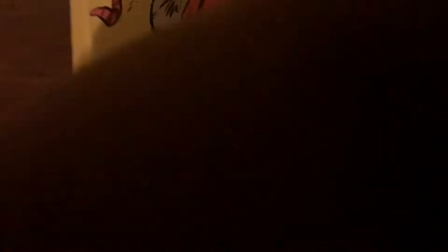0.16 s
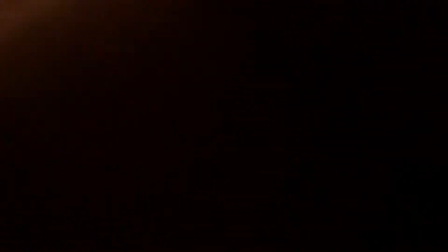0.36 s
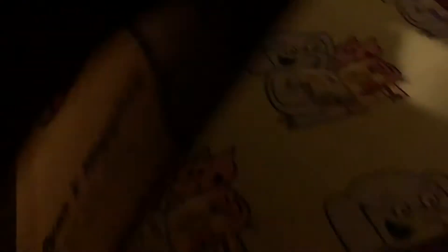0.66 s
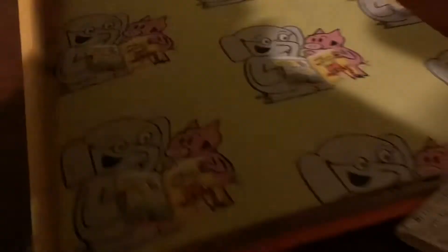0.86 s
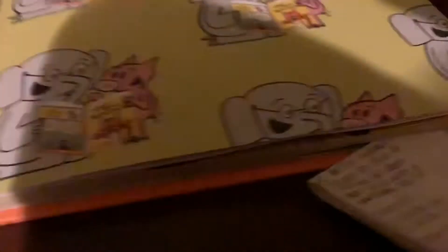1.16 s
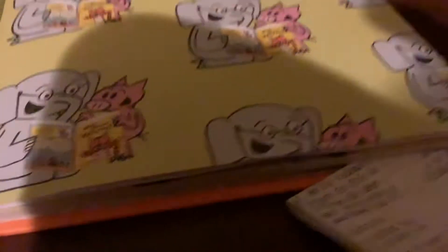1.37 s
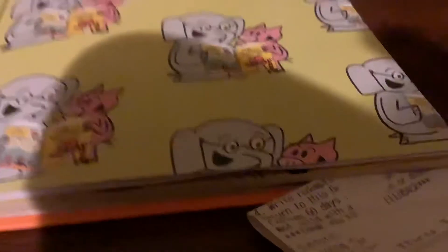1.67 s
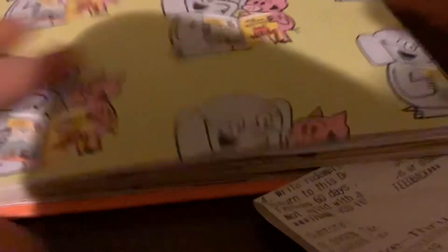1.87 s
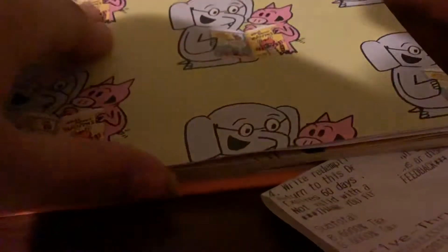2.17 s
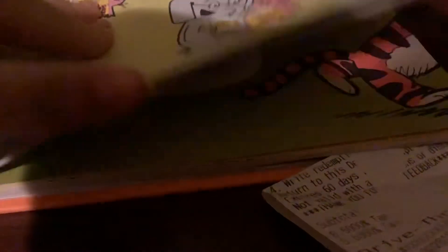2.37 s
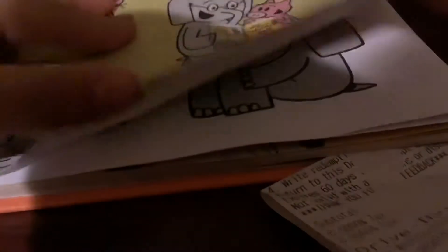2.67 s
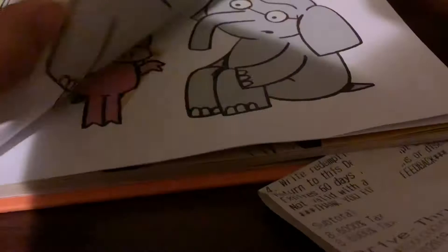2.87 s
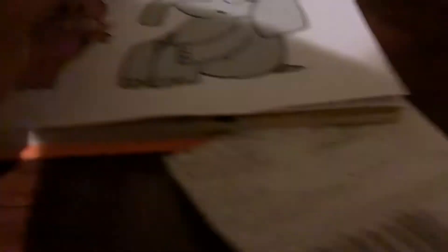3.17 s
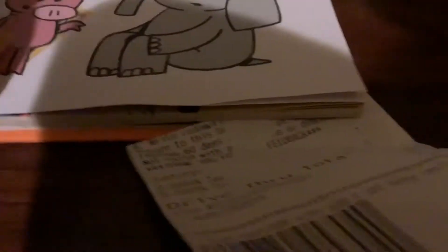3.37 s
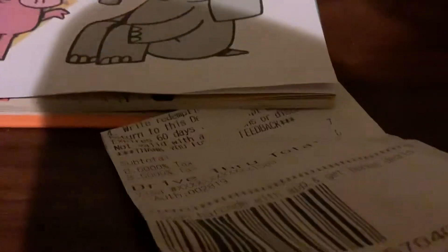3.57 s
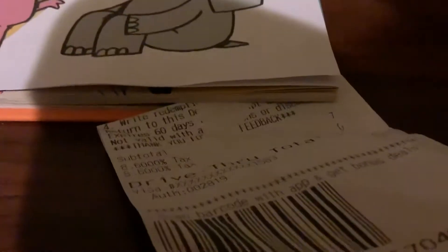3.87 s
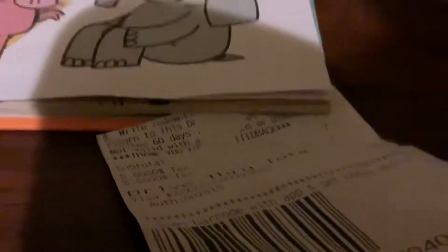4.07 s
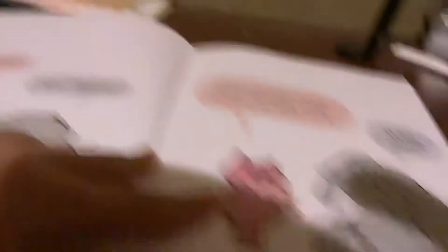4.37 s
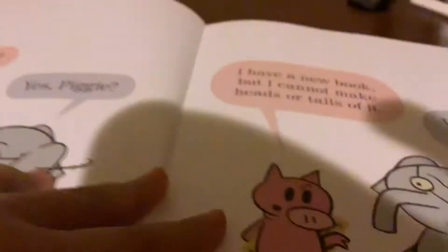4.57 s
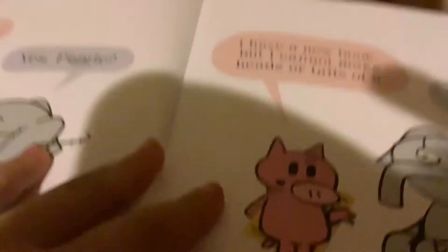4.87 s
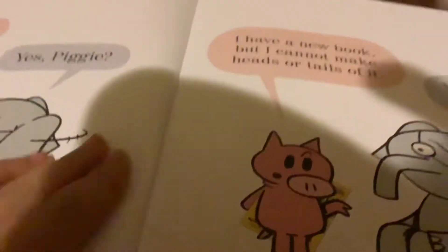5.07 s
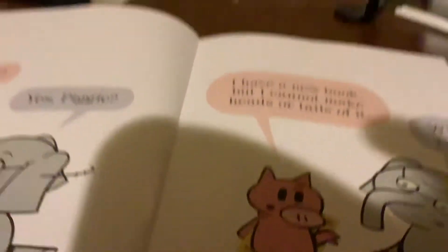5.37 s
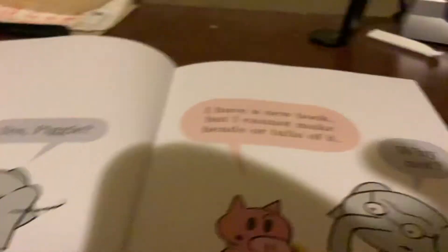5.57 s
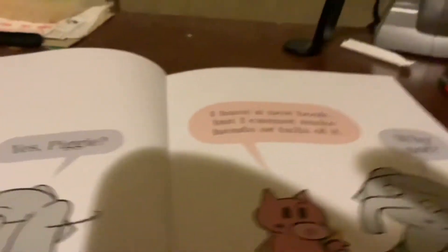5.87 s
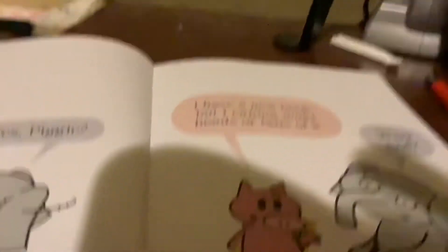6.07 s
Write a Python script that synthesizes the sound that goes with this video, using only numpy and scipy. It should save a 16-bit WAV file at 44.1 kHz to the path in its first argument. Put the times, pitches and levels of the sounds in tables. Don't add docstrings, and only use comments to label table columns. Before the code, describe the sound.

Very close to a small microphone in a quiet room, fingertips hiss on paper while a stiff book cover creaks open and knocks a wooden table. A quieter pause holds a few tiny ticks, then pages turn in a dense crackle of flaps and sharp snaps, ending in a low thump. Smooth rubbing strokes follow, and a last heavy bump.

```python
import sys
import numpy as np
from scipy import signal
from scipy.fft import rfft, irfft, next_fast_len
from scipy.io import wavfile
from scipy.ndimage import uniform_filter1d

SR = 44100
rng = np.random.default_rng(int(sys.argv[2]) if len(sys.argv) > 2 else 0)


def volts_from_decibels(level):
    exponent = np.asarray(level, float) / 20
    return 10 ** exponent


def to_wav(sig):
    pcm = np.clip(np.atleast_2d(sig), -1, 1) * 32767
    pcm = np.round(pcm).astype(np.int16)
    wavfile.write(sys.argv[1], SR, pcm.T)


N = 274783


def rms_one(x):
    return x / np.sqrt(np.mean(x ** 2) + 1e-20)


def peak_one(x):
    return x / (np.abs(x).max() + 1e-20)


def decay(t, t60_s):
    return volts_from_decibels(-60 * t / t60_s)


def onset(t, rise_s):
    return 1 - np.exp(-t / rise_s)


def add(out, s, sound):
    i = max(round(s * SR), 0)
    out[i:i + len(sound)] += sound[:N - i]


def drift(rate_hz):
    step = 20
    r = np.exp(-2 * np.pi * rate_hz * step / SR)
    settle = 4000
    noise = rng.standard_normal(N // step + settle + 2)
    slow = signal.lfilter([1], [1, -2 * r, r * r], noise)[settle:]
    return np.interp(np.arange(N) / step, np.arange(len(slow)), rms_one(slow))


def resonance(x, hz, width_hz):
    r = np.exp(-np.pi * width_hz / SR)
    poles = [1, -2 * r * np.cos(2 * np.pi * hz / SR), r * r]
    return signal.lfilter([(1 - r * r) / 2, 0, (r * r - 1) / 2], poles, x)


def double_resonance(x, hz, width_hz):
    return resonance(resonance(x, hz, width_hz), hz, width_hz)


def coloured(x, spectrum):
    hz, level_db = np.transpose(spectrum)
    size = next_fast_len(len(x))
    bins_hz = np.fft.rfftfreq(size, 1 / SR) + 1e-3
    gain = volts_from_decibels(np.interp(np.log(bins_hz), np.log(hz), level_db, -90, -90))
    return rms_one(irfft(rfft(x, size) * gain, size)[:len(x)])


def friction(spectrum, grain_db, flutter_db, flutter_hz):
    grain_size = np.minimum(rng.exponential(1, N), 4)
    grains = rng.standard_normal(N) * volts_from_decibels(grain_db * grain_size)
    return rms_one(coloured(grains, spectrum) * volts_from_decibels(flutter_db * drift(flutter_hz)))


def movements(rows, own_db, rest_db):
    fade_db, bend = 15, 1.21
    t = np.arange(0, N + 40, 40) / SR
    out = np.full(len(t), volts_from_decibels(rest_db))
    for (s, db, rise_s, fall_s, _), own in zip(rows, own_db):
        away = np.maximum((s - t) / max(rise_s, .01), (t - s) / max(fall_s, .01))
        out += volts_from_decibels(db + own - fade_db * away ** bend)
    return np.interp(np.arange(N) / SR, t, out)


# [t/s, hiss/dB, rise/s, fall/s, lightness/dB]
STROKES = [(0.0, -43.5, .03, 0.059, -19), (0.1, -44.5, 0.018, 0.31, -19.5),
           (0.4, -43.5, 0.067, 0.51, -17), (0.69, -42.5, 0.18, 0.2, -19),
           (0.93, -49, 0.097, 0.076, -18), (1.135, -50, 0.14, 0.034, -20),
           (1.392, -50.5, 0.12, 0.076, -20), (1.614, -42.5, 0.08, 0.3, -7),
           (1.7, -61, 0.17, 0.38, 1), (1.831, -41, 0.11, 0.033, -7), (1.92, -63.5, 0.041, 0.4, -13),
           (2.341, -57.5, 0.013, 0.045, -18), (2.457, -45.5, 0.033, 0.25, -22),
           (2.7, -42, 0.03, 0.084, -23), (2.83, -57, 0.067, 0.33, -32),
           (2.241, -66, 0.78, 0.044, -17),
           (2.972, -46, 0.043, 0.11, -12), (3.046, -50, 0.15, 0.087, -34),
                   (3.2, -43.5, 0.2, 0.078, -14), (3.39, -39, 0.085, 0.098, -15),
                   (3.56, -49, 0.098, .06, -10), (3.67, -46.5, 0.0082, 0.2, -18),
                   (3.751, -38.5, 0.065, 0.041, -15), (3.92, -41, 0.057, 0.034, -35),
                   (3.986, -34.5, 0.01, 0.052, -22), (4.137, -39, 0.026, 0.32, -22),
                   (4.26, -42, 0.21, 0.094, -17), (4.497, -55, 0.058, 0.071, -4),
                   (4.645, -41, 0.11, .15, -17.5), (4.948, -43, 0.062, 0.13, -3),
                   (5.29, -39, 0.15, 0.15, -3.5), (5.69, -39.5, 0.31, 0.037, -21),
                   (5.87, -44, 0.32, 0.093, -19), (6.0, -59, 0.017, .4, -22),
                   (6.149, -41, 0.085, 0.35, -26)]


def touch(base_db, per_lightness_db):
    rows = np.array(STROKES)
    still_db = -91 + base_db - 8 * per_lightness_db
    return movements(rows, base_db + per_lightness_db * rows[:, -1], still_db)


# [f/Hz, density/dB]
PAPER_SPECTRUM = [(1760, -34), (3000, -7.5), (3240, -15.5), (4020, -5), (4520, -2.5), (4910, -5.5),
                  (5450, -3.5), (5930, -10), (6400, -3), (7510, -4), (8160, -1.5), (10500, -2.5),
                  (12400, -8.5), (14800, -17.5), (15800, -17)]
# [f/Hz, level added/dB]
HISS_PARTS = [
    (4500, 5),
    (8300, -2),
    (13200, 8.5),
]


def fingers():
    patchy_db, patchy_hz = 1.6, 6.4
    size = next_fast_len(N)
    hiss = rfft(friction(PAPER_SPECTRUM, grain_db=3.0, flutter_db=1.5, flutter_hz=27.8), size)
    part_hz, offset_db = np.transpose(HISS_PARTS)
    gains = [touch(-11, -0.091), touch(0, 0), touch(-1, 0.66)]
    levels_db = 20 * np.log10(gains) + offset_db[:, None]
    centres = np.log(np.geomspace(3200, 15500, num=12))
    bins = np.log(np.fft.rfftfreq(size, 1 / SR) + 1)
    out = np.zeros(N)
    for centre, window in zip(centres, np.eye(len(centres))):
        shares = [np.interp(centre, np.log(part_hz), row) for row in np.eye(len(part_hz))]
        hiss_band = irfft(hiss * np.interp(bins, centres, window), size)[:N]
        out += volts_from_decibels(shares @ levels_db + patchy_db * drift(patchy_hz)) * hiss_band
    return out


# [start/s, stop/s, end level/dB, swell/dB]
SWIPES = [
    (3.126, 3.155, -28.5, 13),
    (3.172, 3.238, -43, -12),
    (3.036, 3.047, -30, 4),
    (3.3, 3, -38, 2),
]


def swipes():
    out, t = np.zeros(N), np.arange(N) / SR
    hiss = friction(PAPER_SPECTRUM, grain_db=0.0, flutter_db=-1.5, flutter_hz=60)
    for start, stop, end_db, swell_db in SWIPES:
        gate = np.clip((t - start) / 0.0024, 0, 1) * np.clip((stop - t) / 0.0063, 0, 1)
        left = np.clip((stop - t) / (stop - start), 0, 1)
        out += gate * volts_from_decibels(end_db - swell_db * left) * hiss
    return out


# [t/s, peak level/dB, ring f/Hz, sheet body level/dB]
SNAPS = [(0.3516, -13.5, 8700, -31), (0.5531, -17, 5200, -45), (0.7469, -26.5, 8050, -47),
         (0.9248, -32, 7000, -58), (1.506, -46, 10900, -52), (1.605, -14, 4400, -14.5),
         (1.6424, -48, 12100, -31.5), (2.1647, -30, 9700, -55), (2.426, -20, 10100, -28),
         (2.4445, -19, 9100, -23), (3.045, -13.5, 4270, -32), (3.654, -27, 8340, -43),
         (3.726, -29, 4180, -28), (3.733, -16, 4270, -38), (3.8582, -31.5, 6610, -33),
         (3.8869, -32, 3780, -20.5), (3.9, -30, 4200, -30), (3.9638, -22, 3570, -21),
         (3.9703, -.5, 6240, -14.5), (3.995, -27, 7900, -39), (4.13, -15.5, 4500, -26),
         (4.154, -25, 6880, -32), (4.4837, -18.5, 9150, -53), (4.4936, -28.5, 7950, -44),
         (5.3135, -37, 3700, -39.5), (5.6922, -27, 4800, -38), (5.9821, -21, 8440, -27.5),
         (6.0487, -25.5, 7700, -38), (6.0916, -38, 6770, -55), (6.1195, -34, 9700, -48)]
# [t/s, peak level/dB]
TICKS = [(0.025, -33), (0.228, -56), (0.58, -36), (1.116, -48), (1.767, -48), (1.231, -74), (1.2965, -65),
         (1.916, -52), (2.153, -40), (2.266, -58), (2.2977, -46.5), (2.3316, -52), (2.4147, -37),
         (2.695, -35), (2.8818, -31), (3.477, -29), (3.783, -32), (3.834, -34), (4.462, -32.5),
         (4.806, -41), (4.8456, -41), (5.057, -39.5), (6.03, -36), (3.172, -30), (3.18, -30), (3.388, -34),
         (3.399, -34), (3.543, -36), (3.843, -37), (3.922, -33), (3.931, -32), (2.49, -40)]
# [f/Hz, width/Hz, level/dB]
SHEET_MODES = [(1560, 200, 0), (2200, 250, -1), (1000, 800, -5), (2850, 500, -6)]


def snaps():
    tick_hz, tick_body_db = 8200, -12
    tail_db = -25.0
    out, t = np.zeros(N), np.arange(3000) / SR
    edges = SNAPS + [(s, db, tick_hz, db + tick_body_db) for s, db in TICKS]
    chance = rng.standard_normal((len(edges), 2, len(t)))
    high = signal.butter(2, [2600, 11000], "band", fs=SR, output="sos")
    dull = signal.butter(4, 3200, fs=SR, output="sos")
    for (s, peak_db, hz, body_db), (a, b) in zip(edges, chance):
        t60_s = 0.014 * volts_from_decibels(0.17 * np.clip(body_db - peak_db + 19, -15, 15))
        fall = decay(t, t60_s) + volts_from_decibels(tail_db) * decay(t, 0.12)
        crackle = a * fall * onset(t, 0.00027)
        bright = signal.sosfilt(high, crackle) + 2.7 * resonance(crackle, hz, 1040)
        bright = bright - .6 * resonance(bright, 3500, 600)
        add(out, s, volts_from_decibels(peak_db) * peak_one(bright))
        push_fall = volts_from_decibels(-45 * t / t60_s) + volts_from_decibels(tail_db) * decay(t, 0.25)
        push = b * push_fall * onset(t, 0.00043)
        body = np.zeros(len(t))
        for k, (mode_hz, width_hz, db) in enumerate(SHEET_MODES):
            body += volts_from_decibels(db) * peak_one(resonance(push, mode_hz, width_hz)) * (-1) ** k
        add(out, s, volts_from_decibels(body_db + 3.5) * peak_one(signal.sosfilt(dull, body)))
    return out


# [t/s, peak level/dB, centre f/Hz, t60/s]
FLAPS = [(0.719, -29, 810, 0.063), (1.603, -39, 1600, 0.089), (1.647, -43, 856, 0.091),
         (2.36, -45, 1920, 0.045), (2.445, -49, 1510, 0.09), (3.08, -33, 610, 0.48),
         (3.177, -13.5, 806, 0.045), (3.196, -20, 1350, 0.07), (3.227, -25, 513, 0.045),
         (3.343, -30, 700, 0.05), (3.38, -21.5, 600, 0.068), (3.392, -19, 610, 0.055),
         (3.471, -19, 900, 0.066), (3.533, -18, 970, 0.073), (3.542, -24.5, 1450, 0.11),
         (3.575, -31, 1390, 0.094), (3.653, -28.5, 454, 0.12), (3.733, -16.5, 1690, 0.12),
         (3.866, -23.5, 1150, 0.049), (3.888, -21.5, 2100, 0.076), (3.906, -23, 900, 0.14),
         (1.033, -63, 480, 0.045), (3.971, -8, 1740, 0.03), (3.994, -21, 980, 0.092),
         (4.131, -18.5, 2010, 0.049), (4.233, -28, 500, 0.038), (4.808, -44, 990, 0.037),
         (4.33, -36, 550, 0.29), (4.899, -44, 880, 0.027), (6.151, -28.5, 2350, 0.059),
         (3.172, -28, 1910, 0.025), (3.243, -31.5, 517, 0.064), (3.334, -26, 430, .06),
         (3.387, -28, 1940, 0.03), (3.401, -23.5, 1280, 0.044), (3.426, -39, 800, 0.074),
         (3.479, -20, 1640, 0.037), (3.498, -31.5, 620, 0.041), (3.526, -23, 900, .05),
         (3.587, -30.5, 900, 0.072), (3.676, -33, 447, 0.16), (3.835, -42, 750, .06),
         (3.858, -30, 1300, 0.044), (3.921, -21, 1900, .08), (3.93, -23, 1000, 0.089),
         (3.979, -20, 593, 0.057), (4.013, -31, 1000, .06), (4.025, -39, 1600, 0.057)]


def flaps():
    lumpy_db, rise_cycles = 2, 2.4
    out, t = np.zeros(N), np.arange(8000) / SR
    chance = rng.standard_normal((len(FLAPS), 2, len(t)))
    upper = signal.butter(3, [750, 2500], "band", fs=SR, output="sos")
    lower = signal.butter(2, [250, 750], "band", fs=SR, output="sos")
    dull = signal.cheby2(4, 15, 3000, fs=SR, output="sos")
    for (s, peak_db, hz, t60_s), (a, b) in zip(FLAPS, chance):
        fall = decay(t, max(t60_s, .02))
        lumps = volts_from_decibels(lumpy_db * rms_one(uniform_filter1d(b, size=120)))
        puff = a * np.abs(a) ** .5 * lumps * fall * onset(t, rise_cycles / hz)
        top = min(hz / 1600, .7) * signal.sosfilt(upper, puff * fall ** .4)
        broad = top - .55 * signal.sosfilt(lower, puff)
        centre = 1.5 * double_resonance(puff, hz, .5 * hz)
        add(out, s, volts_from_decibels(peak_db) * peak_one(signal.sosfilt(dull, broad + centre)))
    return out


# [t/s, peak level/dB, ring f/Hz, t60/s]
BUMPS = [(0.507, -20.5, 145.5, 0.079), (0.559, -26, 119, 0.056), (0.975, -33, 113.4, 0.21),
         (3.864, -30.5, 110, 0.095), (1.028, -31, 57, 0.09), (1.604, -21.5, 308, 0.061),
         (1.618, -27.5, 82.3, 0.11), (1.612, -24, 200, .1), (1.652, -30, 190, .12), (1.59, -38, 150, .06),
         (5.384, -40, 120, .06), (2.445, -29.5, 106.5, 0.092), (2.883, -34, 169, 0.065),
         (3.179, -20.5, 117, 0.052), (3.209, -29, 111, 0.13), (3.384, -29.5, 297, 0.16),
         (3.655, -30.5, 123, 0.087), (0.121, -37.5, 215, 0.071), (4.232, -15, 300, 0.057),
         (4.137, -21.5, 330, 0.06), (4.196, -24, 103, 0.2), (4.238, -10, 99, 0.13), (4.348, -29, 89, 0.14),
         (4.462, -24.5, 172.4, 0.067), (4.487, -26, 61, 0.078), (5.059, -28, 207, 0.063),
         (5.7, -23.5, 157, 0.075), (5.706, -20, 320, 0.12), (3.046, -35.5, 151, 0.063),
         (5.966, -37, 225, 0.087), (6.117, -19.5, 298, 0.065), (6.125, -10, 112, 0.06),
         (6.149, -13.5, 215, 0.095), (6.224, -15.5, 140, 0.17), (0.0, -33, 150, .08),
         (0.53, -30, 131, 0.09), (4.215, -22, 294, 0.074), (4.29, -32, 97, .1), (4.471, -26, 95, 0.055),
         (6.095, -25.5, 200, 0.18), (6.195, -26, 110, 0.18), (5.693, -26.5, 427, 0.066),
         (3.663, -31.5, 149, 0.033)]
# [f/Hz, level/dB, t60/s]
TABLE_MODES = [(103, -3.5, 0.14), (215, -14.5, 0.13), (63, -14, 0.35)]


def bumps():
    drop_s = .004
    out, t = np.zeros(N), np.arange(16000) / SR
    chance = rng.standard_normal((len(BUMPS), len(TABLE_MODES)))
    shake_band = signal.butter(3, [145, 450], "band", fs=SR, output="sos")
    shakes = rms_one(signal.sosfilt(shake_band, rng.standard_normal((len(BUMPS), len(t)))))
    for (s, peak_db, hz, t60_s), uneven, shake in zip(BUMPS, chance, shakes):
        ring_t60_s = max(t60_s, .03)
        cycles = hz * (t + drop_s * onset(t, 0.0024))
        ring = np.sin(2 * np.pi * cycles) * decay(t, ring_t60_s)
        for (mode_hz, db, mode_t60_s), u in zip(TABLE_MODES, uneven):
            mode_fall = decay(t, mode_t60_s * ring_t60_s / 0.16)
            ring += volts_from_decibels(db + 1.5 * u) * np.sin(2 * np.pi * mode_hz * t) * mode_fall
        ring += .18 * shake * volts_from_decibels(-45 * t / t60_s)
        add(out, s, volts_from_decibels(peak_db) * peak_one(ring * onset(t, 0.0032)))
    return out


# [t/s, peak level/dB, first f/Hz, last f/Hz]
TAPS = [(1.030, -40, 800, 200), (1.506, -44, 1900, 330), (1.763, -48, 1100, 400), (2.427, -32, 1500, 260),
        (2.446, -28, 1500, 300), (2.882, -38, 900, 220), (3.178, -20, 1500, 330), (3.343, -31, 1300, 480),
        (3.972, -18, 2100, 420), (4.134, -31, 900, 280), (4.233, -18, 750, 300), (4.807, -48, 1700, 330),
        (4.834, -48, 1300, 350), (4.899, -47, 1500, 280), (5.056, -34, 700, 240), (5.313, -48, 1200, 200),
        (5.966, -36, 600, 210), (6.117, -24, 750, 300), (1.606, -22, 1400, 200), (0.551, -33, 600, 200)]


def taps():
    drop_s, t60_s, rise_s = .003, .035, .001
    out, t = np.zeros(N), np.arange(4000) / SR
    for s, peak_db, first_hz, last_hz in TAPS:
        cycles = last_hz * t + (first_hz - last_hz) * drop_s * onset(t, drop_s)
        chirp = np.sin(2 * np.pi * cycles) * decay(t, t60_s) * onset(t, rise_s)
        add(out, s, volts_from_decibels(peak_db) * peak_one(chirp))
    return out


# [t/s, peak level/dB, ring f/Hz]
SLIPS = [(0.17, -38, 820), (0.203, -36, 755), (0.235, -36, 830), (0.282, -42, 850), (0.323, -42, 840),
         (0.348, -50, 961), (0.409, -42, 778), (0.46, -33, 764), (0.509, -33, 830), (0.547, -30, 845),
         (0.582, -32, 830), (0.623, -30, 832), (0.645, -32, 899), (0.72, -31, 690), (0.868, -45, 600),
         (0.973, -44, 700)]


def slips():
    out, t = np.zeros(N), np.arange(2000) / SR
    for s, peak_db, hz in SLIPS:
        jolt = rng.standard_normal(len(t)) * decay(t, .07) * onset(t, .002)
        add(out, s, volts_from_decibels(peak_db - 1.5) * peak_one(double_resonance(jolt, hz, 400)))
    return out


# [t/s, cover level/dB, rise/s, fall/s, table over cover/dB]
DRAGS = [(0.0, -38, 0.026, 0.039, -3), (0.512, -45.5, 0.32, 0.23, -6.5), (0.93, -52.5, 1, 0.29, -3),
         (1.39, -53.5, 0.055, 0.082, -5), (1.631, -45.5, 0.045, 0.077, 10.5), (1.78, -63.5, .2, 0.3, 0.5),
         (2.2, -66, 0.18, 0.079, 0), (2.44, -51, 0.027, 0.11, 1), (2.87, -53.5, 0.31, 0.039, -12),
         (3.17, -44, 0.29, 0.082, -6.5), (3.223, -36.5, 0.023, 0.034, 5), (3.381, -44.5, 0.063, 0.14, 4.5),
         (3.56, -38, 0.071, 0.042, -11), (3.71, -41.5, 0.048, 0.17, -3), (3.982, -37.5, 0.18, 0.061, -8.5),
         (4.139, -41, 0.016, 0.39, -1), (4.245, -54, 0.44, 0.12, 10), (4.47, -63.5, 0.13, 0.45, 4),
         (4.85, -62, 0.55, 0.5, 5.5), (5.43, -63, 0.15, 0.34, 11), (5.6, -48.5, 0.18, 0.091, -11),
         (5.702, -38.5, 0.078, 0.055, -21), (5.8, -53.5, 0.14, 0.63, 1.5), (6.17, -46, 0.14, 0.055, 15.5)]
# [f/Hz, density/dB]
COVER_SPECTRUM = [(190, -20.5), (330, -6.5), (415, -5.5), (569, -3.5), (719, -2.5), (859, -8), (1220, -13),
                  (1500, -14.5), (1950, -30), (3300, -120)]
SHEET_SPECTRUM = [(590, -48), (1000, -27), (1230, -15.5), (1420, -5), (1930, -6.5), (2320, -6.5),
                  (3600, -12.5), (4680, -12.5), (7920, -120)]
TABLE_SPECTRUM = [(13, -63), (22, -28), (30, -22), (43, -7), (102, -2), (134, -3.5), (217, -5.5),
                  (439, -14.5), (500, -13), (650, -28), (1100, -120)]


def dragging():
    pushed = movements(DRAGS, np.zeros(len(DRAGS)), rest_db=-89)
    cover = pushed * friction(COVER_SPECTRUM, grain_db=3.0, flutter_db=2.5, flutter_hz=43.0)
    shaken = touch(-21.5, -0.56) + volts_from_decibels(-16) * pushed
    sheet = shaken * friction(SHEET_SPECTRUM, grain_db=0.5, flutter_db=1.5, flutter_hz=39.0)
    table = movements(DRAGS, np.array(DRAGS)[:, -1], rest_db=-65.5)
    table = table * friction(TABLE_SPECTRUM, grain_db=2.5, flutter_db=2.5, flutter_hz=31.8)
    return cover + sheet + table


# [start/s, stop/s, f/Hz, width/Hz, level/dB]
SINGING = [(4.14, 4.245, 1920, 340, -37), (4.23, 4.36, 1760, 330, -38.5), (4.18, 4.31, 4540, 350, -44),
           (4.14, 4.34, 1530, 230, -42), (5.33, 5.7, 1720, 680, -48.5), (5.72, 5.96, 1920, 1800, -47),
           (2.43, 2.64, 1300, 970, -51), (5.45, 6.07, 234, 120, -47), (2.68, 3.01, 4050, 630, -56.5),
           (0.11, 1.01, 817, 350, -50), (0.09, 0.13, 2400, 1500, -50), (2.68, 2.74, 1700, 900, -48),
           (2.68, 2.74, 4500, 700, -50), (5.355, 5.385, 1750, 300, -48), (6.07, 6.125, 1750, 600, -44),
           (1.61, 1.67, 2300, 2200, -45), (1.575, 1.6, 2200, 1500, -54)]


def singing():
    out, t = np.zeros(N), np.arange(N) / SR
    air = rng.standard_normal(N) * volts_from_decibels(2.0 * drift(40))
    for start, stop, hz, width_hz, db in SINGING:
        swell = np.sin(np.pi * np.clip((t - start) / (stop - start), 0, 1))
        out += swell * volts_from_decibels(db) * rms_one(double_resonance(air, hz, width_hz))
    return out


# [lag/s, level/dB]
ECHOES = [
    (.0011, -52),
    (.0023, -38),
    (.0047, -22.5),
]


def scene():
    paper = fingers() + swipes() + flaps() + singing()
    combed = paper.copy()
    for lag_s, db in ECHOES:
        add(combed, lag_s, volts_from_decibels(db) * paper)
    return (combed + snaps() + bumps() + taps() + slips() + dragging())[None]


def low_pass(x):
    return signal.sosfilt(signal.butter(12, 16470, fs=SR, output="sos"), x)


def record(dry):
    x = signal.sosfilt(signal.butter(4, 45, "high", fs=SR, output="sos"), dry)
    x = .8 * np.tanh(x / .8)
    x = signal.sosfilt(signal.cheby2(8, 40, 16600, fs=SR, output="sos"), x)
    return low_pass(x)


dry = scene()
out = record(dry)
to_wav(out)
```